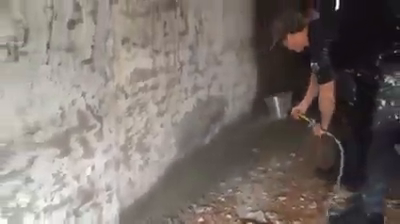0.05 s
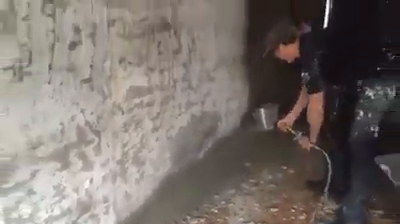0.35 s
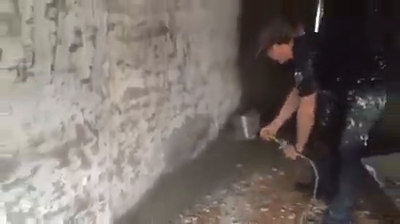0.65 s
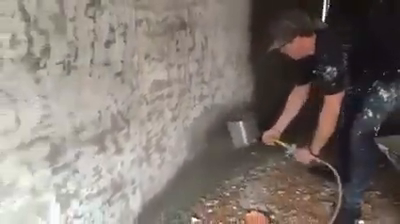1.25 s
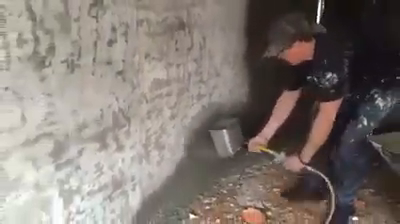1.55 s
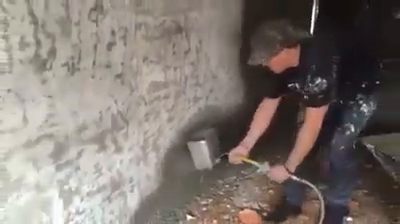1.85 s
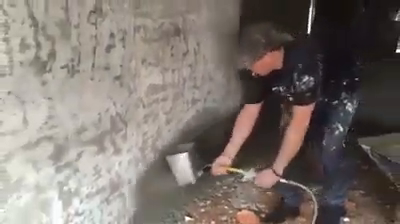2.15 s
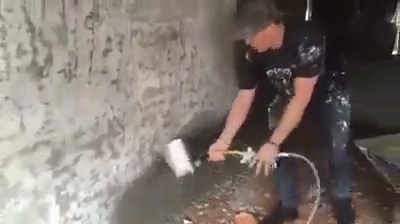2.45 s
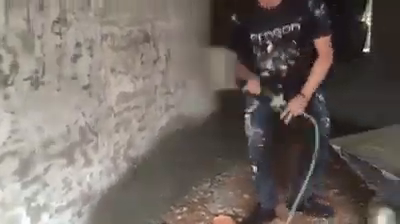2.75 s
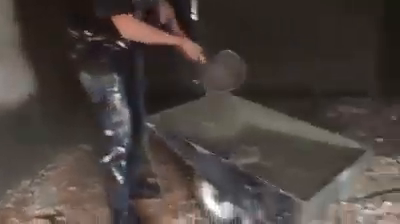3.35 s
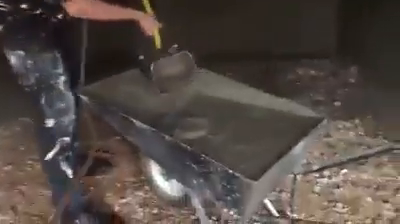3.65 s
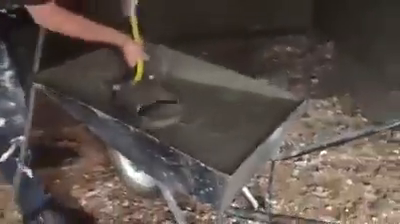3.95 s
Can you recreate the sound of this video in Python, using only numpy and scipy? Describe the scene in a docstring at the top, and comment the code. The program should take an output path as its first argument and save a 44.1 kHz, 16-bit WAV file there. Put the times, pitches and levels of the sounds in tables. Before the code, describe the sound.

The loud hiss of an air sprayer, crackling with wet mortar, fills a bare masonry room and stops abruptly. After a short echo, a faint compressor drone remains, with leaking air and a quiet wet scrape.

```python
"""A compressed-air hopper sprayer blasts wet mortar at a wall in a bare masonry room.
The jet hisses and spits, and the hopper rings hollow as it empties. The valve shuts,
the room rings out and a distant compressor drones on. Leaking a little air, the hopper
swings to a barrow and scoops fresh mortar with a gritty scrape, while sand grinds under
boots. Air and grit are shaped noise; the drone and the room's lingering notes are sine waves."""
import sys
import numpy as np
from scipy import signal
from scipy.fft import rfft, irfft, next_fast_len
from scipy.io import wavfile
from scipy.ndimage import uniform_filter1d, map_coordinates

SR = 44100
rng = np.random.default_rng(int(sys.argv[2]) if len(sys.argv) > 2 else 0)


def pcm_store(signal):
    """Save signal as 16-bit PCM."""
    levels = np.round(np.clip(np.atleast_2d(signal), -1, 1) * 32767)
    wavfile.write(sys.argv[1], SR, levels.astype(np.int16).T)


N = 176400
TIME = np.arange(N) / SR


# Strength of the jet as the mortar feeds unevenly: t/s, relative level/dB
JET_STRENGTH = [(0, -15), (.07, -14.5), (.18, -17), (.29, -15.5), (.48, -15.5), (.58, -15), (.86, -16),
                (.98, -14.5), (1.12, -16), (1.35, -15.5), (1.52, -16), (1.65, -15), (2.0, -16),
                (2.2, -15.5), (2.35, -14.3), (2.5, -16)]
def sprayer(shut_s=2.541, fall_db_per_s=601):
    """Air blasts mortar at the wall until the valve shuts it off."""
    jet_db, = curves(JET_STRENGTH)
    blast = air_jet(jet_db) + wet_mortar(jet_db) + emptying_hopper() + wall_roar()
    valve = 1 / (1 + amp(np.clip(fall_db_per_s * (TIME - shut_s), -200, 200)))
    return amp(3.5) * valve * blast


# Tone of the jet (how strong each pitch is): f/Hz, level/dB
JET_TONE = [(60, -45), (110, -22), (250, -13.5), (420, -12.5), (560, -6), (750, -9), (1000, -3), (1450, 1),
            (2500, 0), (4000, -0.5), (7000, -2.5), (14500, -8.5)]
def air_jet(jet_db):
    """Fast, swirling air makes a fluttering hiss."""
    flutter_db = 0.34 * wobble(25.45)
    return amp(jet_db + flutter_db) * patchy(noise(JET_TONE), depth_db=0.66)


# Lumps of mortar bursting in the jet: t/s, relative level/dB
LUMP_BURSTS = [(.035, -13), (.243, -9.5), (.478, -14), (.6, -36), (.685, -18), (.728, -10), (.95, -21),
               (1.05, -11), (1.272, -20), (1.405, -12.5), (1.591, -13), (1.64, -18.5), (1.688, -13.5),
               (2.008, -11.5), (2.28, -12), (2.32, -13.5), (2.344, -8), (2.375, -14.5), (2.475, -8)]
# Tone of the spitting: f/Hz, level/dB
SPIT_TONE = [(70, -49.5), (300, -18.5), (1200, 5), (3000, 5), (7000, 10.5), (14500, 9)]
def wet_mortar(jet_db):
    """Mortar spits, lumps burst and wet drops crack in the jet."""
    spits = amp(jet_db - 6.5 + 1.2 * wobble(19.0)) * grains(per_s=130, life_s=0.0068, scatter_db=2.0)
    lumps = sum(amp(db) * stroke(s, rise_s=0.00035, fade_s=0.076) for s, db in LUMP_BURSTS)
    spatter = np.hypot(spits, lumps) * noise(SPIT_TONE)
    cracks = amp(jet_db - 17.5) * grains(per_s=29, life_s=0.00087, scatter_db=1.0)
    return spatter + cracks * noise(JET_TONE)


# Tone of dry air: f/Hz, level/dB
DRY_AIR_TONE = [(2000, -34.5), (5000, -12.5), (7500, 5), (14500, -2.5)]
# Hollow notes of the hopper: peak t/s, swell time/s, f/Hz, width/Hz, relative level/dB
HOPPER_NOTES = [(0.76, 0.72, 546, 58, -38), (0.17, 0.75, 258, 85, -41), (1.35, .3, 272, 34, -42),
                (1.1, 0.64, 425, 28, -43), (2.28, 0.18, 484, 48, -36.5), (2.3, 0.54, 419, 24, -41.5),
                (2.38, 0.11, 329.8, 70, -34)]
def emptying_hopper(from_s=1.4, empty_s=2.35):
    """Dry air hisses louder as the hopper empties, and hollow notes come and go."""
    emptiness = np.clip((TIME - from_s) / (empty_s - from_s), 0, 1)
    dry_air = emptiness * amp(-20.5) * noise(DRY_AIR_TONE)
    hollow = sum(amp(db) * swell(s, swell_s) * ring(hz, width)
                 for s, swell_s, hz, width, db in HOPPER_NOTES)
    return dry_air + hollow


# Strength of the roar: t/s, relative level/dB
ROAR_STRENGTH = [(0, -33), (.25, -35), (.55, -34.5), (.8, -28), (1.05, -35.5), (1.3, -33.5), (1.7, -37),
                 (1.95, -34), (2.2, -40), (2.5, -35)]
# Tone of the roar: f/Hz, level/dB
ROAR_TONE = [(85, -45.5), (112, -9), (150, -4.5), (250, -7), (400, -17), (900, -23.5)]
def wall_roar():
    """The jet hits the wall with a low roar."""
    roar_db, = curves(ROAR_STRENGTH)
    return amp(roar_db) * noise(ROAR_TONE)


# Air leaking from the nozzle: t/s, rush level/dB, whisper level/dB
LEAK_STRENGTH = [(2.9, -79, -82.5), (2.98, -84, -88), (3.11, -62, -86), (3.22, -49.5, -74.5),
                 (3.29, -45, -60), (3.35, -45, -45), (3.42, -52.5, -53), (3.47, -49.5, -60),
                 (3.59, -51, -68), (3.68, -44, -59), (3.8, -45, -51), (4, -43.5, -72)]
# Tones of the low rush and the high whisper: f/Hz, level/dB
RUSH_TONE = [(150, -12.5), (400, -2.5), (750, -0.5), (1050, 0), (2000, -6.5), (4000, -12.5), (8000, -16.5),
             (14500, -29.5)]
WHISPER_TONE = [(3000, -18), (7000, -8), (9500, 0), (12500, -.5), (14500, -5)]
def leak():
    """A little air escapes; its high whisper flares as the nozzle swings past."""
    rush_db, whisper_db = curves(LEAK_STRENGTH)
    rush = amp(rush_db) * patchy(noise(RUSH_TONE), depth_db=1.0)
    return rush + amp(whisper_db) * noise(WHISPER_TONE)


# Pushes into the mortar: t/s, relative level/dB, fade time/s
PUSHES = [(3.6, -45.5, 0.63), (3.645, -45, 0.15), (3.68, -38, 0.17), (3.712, -46, 0.17), (3.744, -38, 0.2),
          (3.785, -44, 0.15), (3.854, -33, 0.1), (3.885, -42.5, 0.43), (3.979, -40.5, 0.24)]
# Tones of the wet slush and the scrape: f/Hz, level/dB
SLUSH_TONE = [(100, -10), (200, 6), (300, 5.5), (500, 5), (750, -1), (1100, 2.5), (2000, -7.5), (4000, -18),
              (8000, -17), (14500, -32)]
SCRAPE_TONE = [(300, -7), (1400, 2.5), (3000, 0.5), (6000, 5), (14500, 1.5)]
def scoop():
    """The hopper digs into gritty wet mortar, then gives a bright scrape."""
    pushes = sum(amp(db) * stroke(s, 0.0064, fade_s) for s, db, fade_s in PUSHES)
    grit = grains(per_s=700, life_s=0.0043, scatter_db=1.5)
    slush = pushes * grit * patchy(noise(SLUSH_TONE), depth_db=3.0)
    drag = amp(-31) * stroke(3.93, rise_s=0.007, fade_s=9.1)
    scrape = drag * grains(per_s=1500, life_s=0.0049, scatter_db=0.0) * noise(SCRAPE_TONE)
    return amp(4.5) * slush + scrape


# Scuffs as the worker turns and stoops: t/s, level/dB, fade time/s
SAND_SCUFFS = [(2.735, -54, 0.7), (2.82, -59.5, 0.74), (3.025, -78, .4), (3.115, -60, 0.63),
               (3.51, -52, .25), (3.55, -52, 0.1), (3.625, -49, .15), (3.657, -48, .07), (3.682, -46, 0.1),
               (3.745, -48, .07), (3.775, -47, .07), (3.812, -43, .1), (3.856, -40, 0.078)]
# Tone of the sand: f/Hz, level/dB
SAND_TONE = [(500, -16), (2000, 2), (6000, 2), (9000, -2), (14500, -9)]
def scuffs():
    """Sand grinds briefly under boots and tool."""
    strokes = sum(amp(db) * stroke(s, 0.003, fade_s) for s, db, fade_s in SAND_SCUFFS)
    return strokes * grains(per_s=600, life_s=0.0024, scatter_db=4.5) * noise(SAND_TONE)


# How long the room echoes: f/Hz, fade time/s
ECHO_FADE = [(100, 1.0), (380, 1.8), (700, 0.94), (1500, 0.66), (3500, 0.49), (7000, 0.29), (14500, 0.25)]
# Tone of the echoes: f/Hz, level/dB
ECHO_TONE = [(100, 0), (3500, 0), (7000, -3), (14500, -2)]
def room_echo(x, spots=12):
    """Bare walls echo; the pattern changes as the sprayer moves from spot to spot."""
    x = np.concatenate([x[:SR // 2][::-1], x])  # a lead-in, so the room already rings at the start
    place = np.linspace(0, spots - 1, len(x))
    out = np.zeros(len(x) + SR + 256)
    for spot in range(spots):
        hz, t, bands = signal.stft(rng.standard_normal(SR), SR, nperseg=256)
        fade_s = along(ECHO_FADE, hz)[:, None]
        tail_db = along(ECHO_TONE, hz)[:, None] - 60 * t / fade_s
        tail = signal.istft(bands * amp(tail_db) / np.sqrt(fade_s), SR, nperseg=256)[1]
        near = np.flatnonzero(abs(place - spot) < 1)
        blend = np.cos((place[near] - spot) * np.pi / 2)
        echo = signal.fftconvolve(x[near] * blend, tail / np.linalg.norm(tail))
        out[near[0]:][:len(echo)] += echo
    return out[SR // 2:][:N]


# Notes that ring between the walls: f/Hz, level/dB, fade time/s
WALL_NOTES = [(184.7, -47, 2), (323, -50, 3), (364, -48.5, 3), (416, -44, 1.4), (486, -47.5, 1.3),
              (568, -52.5, 1.2)]
def room_notes(peak_s=2.541, build_db_per_s=14.5):
    """Sound trapped between the walls builds up during the blast and rings on after it."""
    before, after = np.maximum(peak_s - TIME, 0), np.maximum(TIME - peak_s, 0)
    notes = 0
    for hz, db, fade_s in WALL_NOTES:
        level_db = db - build_db_per_s * before - 60 * after / fade_s + 1.5 * wobble(4.4)
        notes += amp(level_db) * np.sin(2 * np.pi * hz * TIME + 0.37 * wobble(9.8))
    return np.sqrt(2) * notes


# Notes of the compressor's drone: f/Hz, level/dB
DRONE_NOTES = [(107.7, -49.5), (141, -57.5), (177, -56.5), (213, -68), (244, -66.5), (301, -61)]
# Rise and fall of the drone: t/s, added level/dB
DRONE_SWELL = [(0, -1), (.2, 9), (.6, 11.5), (.9, 12), (1.13, 8), (1.25, -8), (1.42, 5), (2.2, 0),
               (2.7, -1), (3.0, 0.5), (3.35, 2), (3.65, -6), (4, -7)]
def compressor():
    """A distant compressor hums, slightly unsteady in pitch and loudness."""
    swell_db, = curves(DRONE_SWELL)
    clock = TIME + np.cumsum(0.009 * wobble(7.9)) / SR
    hum = sum(amp(db + 2.8 * wobble(11)) * np.sin(2 * np.pi * (hz * clock + rng.random()))
              for hz, db in DRONE_NOTES)
    return np.sqrt(2) * amp(swell_db) * hum


# Tone of the building site: f/Hz, level/dB
SITE_TONE = [(25, -20), (70, -15), (130, -3), (400, -12.5), (800, -18.5), (2000, -27.5), (4000, -39.5),
             (14500, -42.5)]
def site_rumble():
    """The site rumbles faintly behind everything."""
    return amp(-52) * noise(SITE_TONE)


# Puffs of air: peak t/s, swell time/s, level/dB
AIR_PUFFS = [(.11, .025, -56), (.21, .03, -48), (0.341, 0.025, -45), (0.8, .03, -43), (1.173, 0.06, -47),
             (1.36, .025, -46), (1.455, .03, -44), (1.6, 0.1, -46), (2.02, .025, -49), (2.16, .03, -47),
             (2.46, .06, -50.5), (3.415, .04, -49), (3.58, .03, -50.5), (3.83, .04, -57)]
# Tone of the puffs: f/Hz, level/dB
PUFF_TONE = [(15, -18), (35, -4.5), (75, 5.5), (110, 0), (250, -31.5)]
def puffs():
    """Stirred air thumps softly on the microphone."""
    return noise(PUFF_TONE) * sum(amp(db) * swell(s, swell_s) for s, swell_s, db in AIR_PUFFS)


def amp(db):
    """Turn decibels into a number to multiply by."""
    return 10 ** (np.asarray(db) / 20)


def unit(x):
    """Scale to an average strength (rms) of 1."""
    return x / np.sqrt(np.mean(x ** 2) + 1e-20)


def along(points, hz):
    """Read between the rows of a (frequency, value) table on a pitch scale."""
    freqs, values = np.transpose(points)
    return np.interp(np.log(hz + 1), np.log(freqs + 1), values)


def curves(rows):
    """Join a table's points over time: one curve for each column after the first."""
    times, *columns = np.transpose(rows)
    return [np.interp(TIME, times, column) for column in columns]


def wobble(per_s):
    """A smooth curve through per_s random points a second."""
    return map_coordinates(rng.standard_normal(4096), [TIME * per_s], mode="wrap")


def filtered(x, response):
    """Turn each frequency up or down by response(hz)."""
    size = next_fast_len(N + SR // 4)
    return irfft(rfft(x, size) * response(np.fft.rfftfreq(size, 1 / SR)), size)[..., :N]


def noise(tone):
    """Noise of strength 1, shaped by a tone table."""
    return unit(filtered(rng.standard_normal(N), lambda hz: amp(along(tone, hz))))


def ring(hz, width_hz):
    """A breathy note, like air blowing through something hollow."""
    return unit(filtered(rng.standard_normal(N), lambda f: 1 / (1 + ((f - hz) / width_hz) ** 2) ** 2))


# How much each pitch flickers: f/Hz, depth multiplier
FLICKER = [(300, 1.1), (3000, 1.93), (6000, 3), (14500, 1.7)]
def patchy(x, depth_db):
    """Swirling makes short patches of low and high sound swell and fade."""
    hz, _, bands = signal.stft(x, SR, nperseg=512)
    patches = uniform_filter1d(rng.standard_normal(bands.shape), size=7, axis=0)
    patches = unit(uniform_filter1d(patches, size=18, axis=1))
    flicker_db = depth_db * along(FLICKER, hz)[:, None] * patches
    return unit(signal.istft(bands * amp(flicker_db), nperseg=512)[1][:N])


def grains(per_s, life_s, scatter_db):
    """Loudness curve of many tiny random bursts, each with a sharp start."""
    hits = (rng.random(N) < per_s / SR) * amp(scatter_db * rng.standard_normal(N)) ** 2
    energy = signal.lfilter([1], [1, -np.exp(-2 / (life_s * SR))], hits)
    return unit(np.sqrt(energy))


def stroke(start_s, rise_s, fade_s):
    """Loudness curve that jumps up, then drops 60 dB over the fade time."""
    t = np.maximum(TIME - start_s, 0)
    return (1 - np.exp(-t / rise_s)) * amp(-60 * t / fade_s)


def swell(peak_s, swell_s):
    """Bell-shaped loudness curve."""
    return np.exp(-((TIME - peak_s) / swell_s) ** 2)


# Moments when the sound spreads left and right: start t/s, end t/s
WIDE_MOMENTS = [(.09, 0.24), (.37, 0.58), (.6, 0.75), (.81, 0.91), (1.345, 1.487), (1.58, 1.67),
                (1.715, 1.825), (1.82, 1.94), (2.09, 2.19)]
def scene(widen_s=0.049):
    """The work and its room sit in the centre; now and then the sound briefly spreads left and right."""
    work = sprayer() + leak() + scoop() + scuffs()
    centre = work + amp(-8.5) * room_echo(work) + room_notes() + compressor() + site_rumble() + puffs()
    spread = sum(np.clip(np.minimum(TIME - start, end - TIME) / widen_s, 0, 1) ** 2
                 for start, end in WIDE_MOMENTS)
    side = (amp(-72) + amp(-19.5) * spread) * room_echo(work)
    return np.array([centre + side, centre - side])


# Tone of the microphone: f/Hz, level/dB
MIC_TONE = [(20, 0), (4400, 0), (4560, -14), (4800, -11.5), (5400, -10), (15000, -10)]
def record(dry):
    """The microphone dulls the high sounds and cuts off the very highest."""
    top_hz = 14850
    return filtered(dry, lambda hz: amp(along(MIC_TONE, hz) - (np.maximum(hz - top_hz, 0) / 50) ** 2))


dry = scene()
out = record(dry)
pcm_store(out)
```